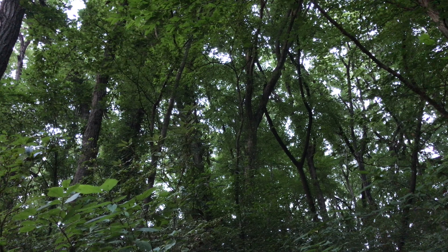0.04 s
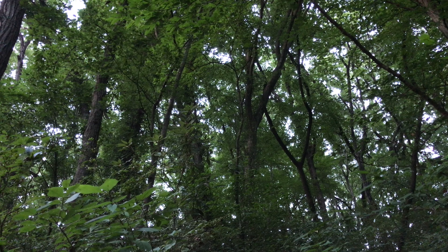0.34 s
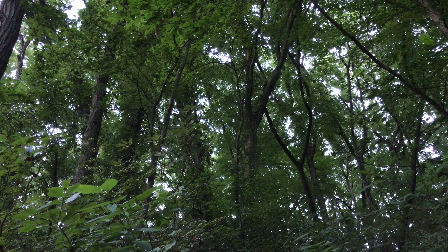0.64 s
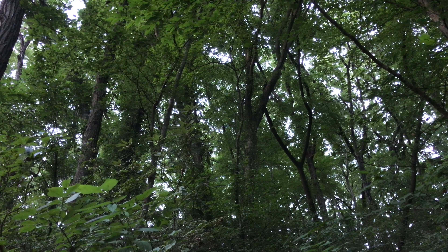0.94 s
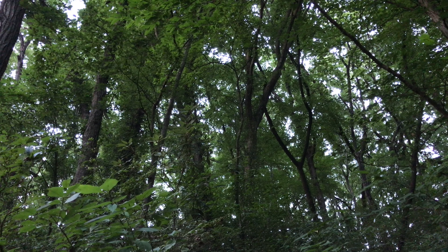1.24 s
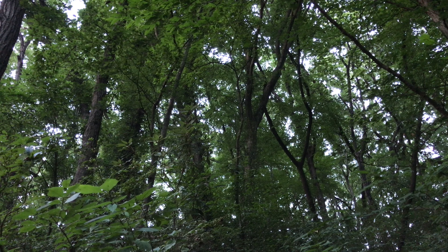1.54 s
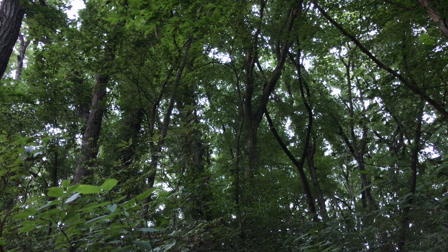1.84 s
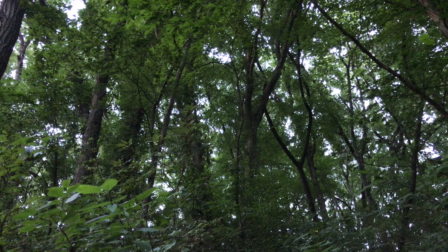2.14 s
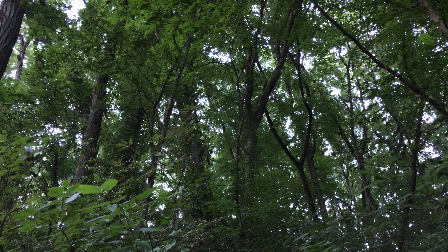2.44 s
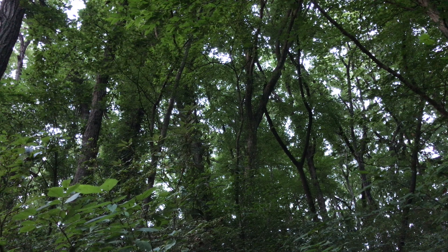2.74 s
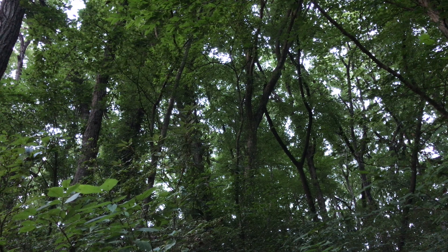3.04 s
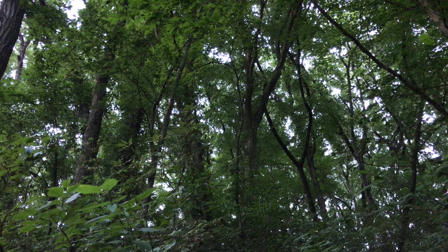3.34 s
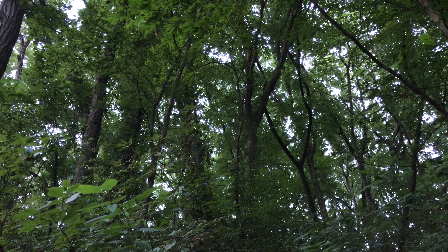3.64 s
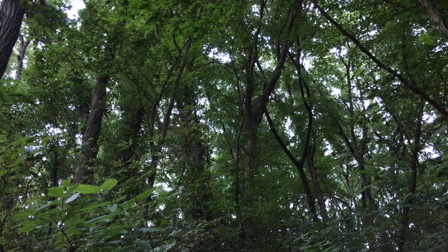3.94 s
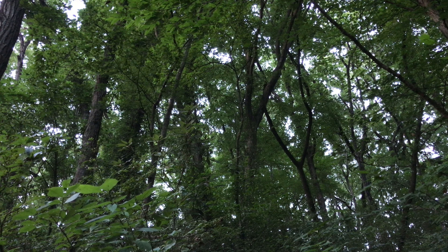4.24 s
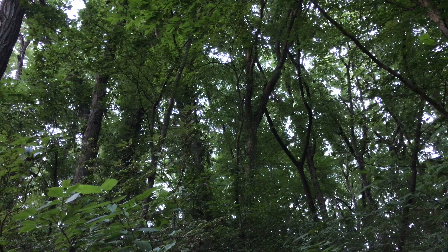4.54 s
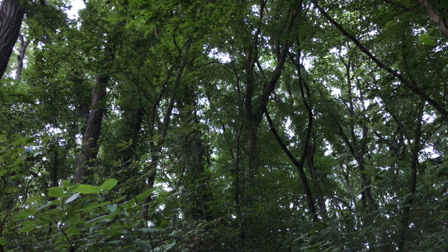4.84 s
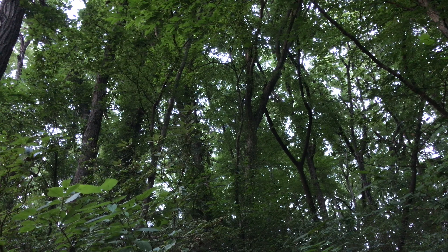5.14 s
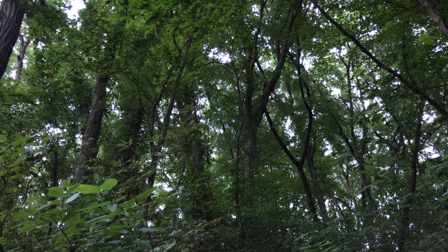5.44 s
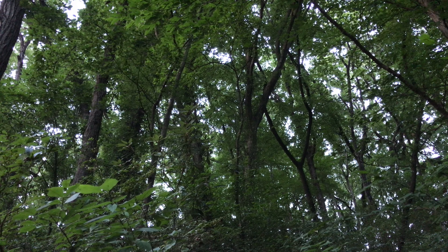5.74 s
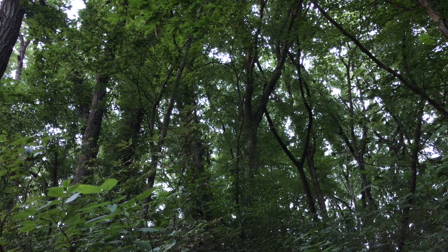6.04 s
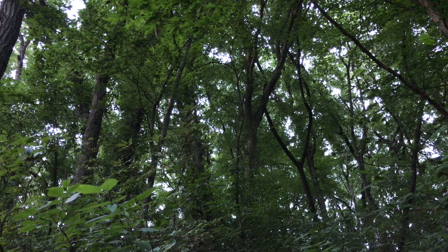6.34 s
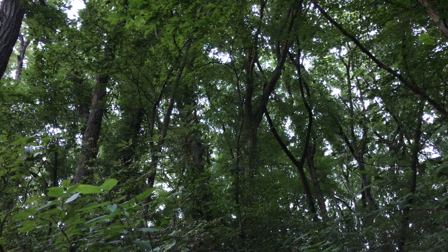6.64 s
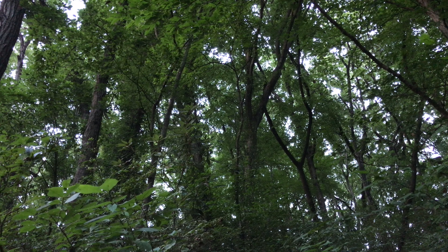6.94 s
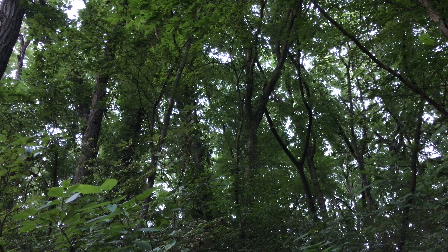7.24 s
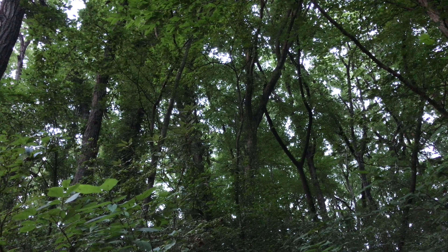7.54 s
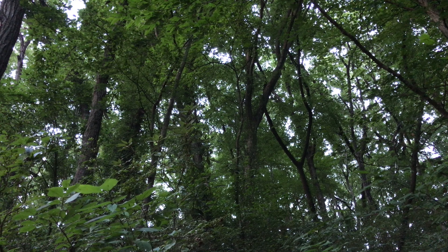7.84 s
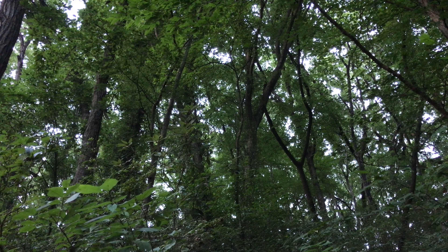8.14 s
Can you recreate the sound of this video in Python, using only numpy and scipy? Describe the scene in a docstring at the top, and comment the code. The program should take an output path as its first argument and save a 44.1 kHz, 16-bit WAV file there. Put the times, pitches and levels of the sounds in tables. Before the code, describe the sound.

Cicadas call in overlapping pulsing trills over the steady high hiss of a cicada chorus in a forest, with a low rumble underneath.

```python
"""Evening cicadas in a broadleaf wood

Pulsing trills overlap, each slowing and sinking in pitch as it runs down: a tymbal clicks and
the hollow abdomen rings on its overtones. A few calls break into harsh squawks. Behind them a
canopy full of buzzing cicadas merges into one steady high hiss. A far rumble lies underneath,
leaves stir faintly, and now and then a twig or leaf ticks."""
import sys
import numpy as np
from scipy import signal
from scipy.fft import rfft, irfft, next_fast_len
from scipy.io import wavfile
from scipy.ndimage import map_coordinates

SR = 44100
rng = np.random.default_rng(int(sys.argv[2]) if len(sys.argv) > 2 else 0)


def put_to_file(sound):
    """Save the sound as 16-bit audio at rate SR, in the file named by the first command-line argument."""
    columns = np.atleast_2d(sound).T  # one column per channel
    safe = np.clip(columns, -1, 1)
    whole_steps = np.round(safe * 32767)
    wavfile.write(sys.argv[1], SR, whole_steps.astype(np.int16))


N = 365588


def amp(db):
    """Decibels to gain."""
    return 10 ** (np.asarray(db) / 20)


def rms(x):
    """Root mean square."""
    return np.sqrt(np.mean(x ** 2) + 1e-20)


def clock():
    """Time of every sample in seconds."""
    return np.arange(N) / SR


def along(points, hz):
    """Read (Hz, value) points on a log frequency axis."""
    freqs, values = np.transpose(points)
    return np.interp(np.log(hz + 1), np.log(freqs + 1), values)


def wobble(rate):
    """A smooth random curve with `rate` knots a second."""
    knots = rng.standard_normal(int(N * rate / SR) + 4)
    coarse = np.arange(0, N, 16)
    return np.interp(np.arange(N), coarse, map_coordinates(knots, [coarse * rate / SR]))


def filtered(x, response):
    """EQ a sound with a gain given as a function of frequency."""
    size = next_fast_len(len(x) + SR // 4)
    return irfft(rfft(x, size) * response(np.fft.rfftfreq(size, 1 / SR)), size)[:len(x)]


def coloured(x, spectrum):
    """Shape a sound with (Hz, dB) points and bring it to rms 1."""
    shaped = filtered(x, lambda hz: amp(along(spectrum, hz)))
    return shaped / rms(shaped)


# The wood's reverb. Each row: frequency in Hz, seconds to die away by 60 dB.
FOREST_DECAY = [(500, 0.82), (4000, 1), (10000, 0.29)]

def forest(x, wet_db):
    """Trunks and leaves scatter part of a sound into a tail; its power stays the same."""
    hz, age, noise = signal.stft(rng.standard_normal(SR // 2), SR, nperseg=256)
    decay = amp(-60 * age / along(FOREST_DECAY, hz)[:, None])
    tail = signal.istft(noise * decay, SR, nperseg=256)[1]
    mix = x + amp(wet_db) * signal.fftconvolve(x, tail / np.linalg.norm(tail))[:N]
    return mix * rms(x) / rms(mix)


def foliage(x, treble_db):
    """A shelf above the main ring: leaves dull a voice, while a positive setting brightens it."""
    return filtered(x, lambda hz: amp(along([(4800, 0.027), (6300, treble_db)], hz)))


# The abdomen favours two groups of overtones: one an octave below the pitch, one around and above it.
# Each row: multiple of the click rate, relative level in dB.
LOWER_RING = [(6, -12.5), (7, -0.5), (8, -23.5)]
UPPER_RING = [(12, -25), (13, -4.5), (14, 2), (15, -10.5), (16, -24), (21, -5), (28, -1), (35, -17.5),
              (42, -32)]
PITCH_MULTIPLE = 14  # the overtone heard as the pitch

def tymbal(pitch, effort, jitter, lower_db, rough_db, flank_db):
    """The tymbal buckles unevenly, about 300 times a second; the abdomen rings on its overtones."""
    singing = effort > 1e-9
    click_rate = pitch / PITCH_MULTIPLE * (1 + jitter * wobble(260))
    phase = 2 * np.pi * np.cumsum(click_rate)[singing] / SR
    # a sharply tuned abdomen weakens the overtones that flank its rings
    flank = lambda k: flank_db * (k % (PITCH_MULTIPLE // 2) > 0)
    ring = lambda overtones: sum(amp(db + flank(k)) * np.sin(k * phase) for k, db in overtones)
    voice = np.zeros(N)
    voice[singing] = ring(UPPER_RING) + amp(lower_db) * ring(LOWER_RING)
    strength = amp(rough_db * np.minimum(wobble(220), 2))
    return np.sqrt(2) * effort * voice * strength / rms(strength)


WIND_UP_HZ, WIND_UP_DB = 168.7, 6  # a call starts this far below its full pitch and level

def course(start, length, wind_up_s, hz, sink_hz, db, fade_db):
    """Pitch and level of one call: it winds up quickly, then sinks and fades as the insect tires."""
    age = np.maximum(clock() - start, 0)
    slack = np.exp(-age / wind_up_s)
    spent = np.minimum(age / length, 1) ** 1.5
    waver_hz = 7 * wobble(14)  # no two syllables land on quite the same pitch
    pitch = hz - WIND_UP_HZ * slack - sink_hz * spent + waver_hz
    return pitch, db - WIND_UP_DB * slack - fade_db * spent


def syllable(start, length):
    """One squeeze of the abdomen: a rounded swell."""
    progress = np.clip((clock() - start) / length, 0, 1)
    return np.sqrt(np.abs(np.sin(np.pi * progress)))


def rhythm(start, count, first_gap, last_gap, stamina):
    """Syllable times of one call: the gaps widen, and the greater the stamina the later they do."""
    gaps = first_gap + (last_gap - first_gap) * np.linspace(0, 1, count - 1) ** stamina
    return start + np.append(0, np.cumsum(gaps))


def caller(times, hz, sink_hz, db, fade_db, syllable_s, jitter, rough_db, lower_db, flank_db,
           treble_db, wet_db, wind_up_s=0.0089):
    """A near cicada sings separate syllables, uneven in strength, along the course of its call."""
    length = times[-1] + syllable_s - times[0]
    pitch, level_db = course(times[0], length, wind_up_s, hz, sink_hz, db, fade_db)
    syllables = sum(amp(0.36 * rng.standard_normal()) * syllable(start, syllable_s) for start in times)
    voice = tymbal(pitch, amp(level_db) * syllables, jitter, lower_db, rough_db, flank_db)
    return forest(foliage(voice, treble_db), wet_db)


def near_cicadas():
    """A low, a close and a high caller finish their calls, a long one takes over, a late one follows."""
    low = rhythm(start=-.066, count=17, first_gap=.102, last_gap=.125, stamina=3.8)
    close = rhythm(start=-.046, count=4, first_gap=.124, last_gap=.133, stamina=3)
    high = rhythm(start=-.02, count=12, first_gap=.115, last_gap=.183, stamina=6.5)
    long = rhythm(start=.683, count=28, first_gap=.083, last_gap=.121, stamina=.72)
    late = rhythm(start=6.195, count=16, first_gap=.095, last_gap=.149, stamina=.52)
    return (caller(low, hz=3744, sink_hz=39.76, db=-53, fade_db=4, syllable_s=.049,
                   jitter=.003, rough_db=2.5, lower_db=-8.5, flank_db=-5, treble_db=1, wet_db=-12)
            + caller(close, hz=4232, sink_hz=32.1, db=-50.5, fade_db=-0.3, syllable_s=.068,
                     jitter=.0015, rough_db=3, lower_db=-1, flank_db=-12, treble_db=5.5, wet_db=-12)
            + caller(high, hz=4376, sink_hz=42, db=-60.5, fade_db=4.5, syllable_s=.035,
                     jitter=.0046, rough_db=3.5, lower_db=5.5, flank_db=0.5, treble_db=-12, wet_db=-5)
            + caller(long, hz=4236, sink_hz=182.9, db=-56, fade_db=11, syllable_s=.0564, wind_up_s=.11,
                     jitter=.00502, rough_db=4, lower_db=-7.5, flank_db=-1.5, treble_db=-8, wet_db=-6)
            + caller(late, hz=4374, sink_hz=128.8, db=-68, fade_db=13, syllable_s=.049,
                     jitter=.0184, rough_db=3, lower_db=2.5, flank_db=-4, treble_db=-12, wet_db=-4))


# Trills from deeper in the wood. Each row: start, length and wind-up in seconds, pitch and sink in Hz,
# level and fade in dB, jitter as a share of the click rate, lower octave in dB.
FAR_CALLS = [(0.0, 0.46, 0.0087, 4234, 26, -54.5, 4, 0.001, -15),
             (1.047, 2.45, .03, 4141, 125, -58.5, 9, 0.0066, -9),
             (1.45, 1.42, 0.0091, 4355, 19, -67, 6, 0.0022, -8.5),
             (2.597, 2.3, 0.0194, 4274, 55, -80, 9, 0.00813, 4.5),
             (4.66, 3.85, .25, 4413, 135, -65.5, 10.5, .003, -12),
             (6.105, 2.13, 0.054, 4160, 71, -69, 9.5, 0.019, -4.5),
             (7.67, 2.4, 0.021, 4237, 122, -69, 12, .008, -8)]
FIRST_RATE, LAST_RATE = 14, 8.5  # syllables a second as a trill starts and ends

def far_trill(start, length, wind_up_s, hz, sink_hz, db, fade_db, jitter, lower_db):
    """A far cicada: its syllables slow down as the call runs out, and echoes fill the gaps."""
    pitch, level_db = course(start, length, wind_up_s, hz, sink_hz, db, fade_db)
    end = start + length
    beat = np.cumsum(np.interp(clock(), [start, end], [FIRST_RATE, LAST_RATE])) / SR
    pulsing = amp(5 * np.sin(2 * np.pi * beat))
    singing = np.interp(clock(), [start - .03, start + .01, end, end + .034], [0, 1, 1, 0])
    effort = amp(level_db) * singing * pulsing / rms(pulsing)
    voice = tymbal(pitch, effort, jitter, lower_db, rough_db=5, flank_db=-7.5)
    return forest(foliage(voice, treble_db=-5), wet_db=2)


def buzzer(click_rate, scatter):
    """The click train of one buzzing cicada, uneven in timing and strength."""
    count = int(click_rate * N / SR)
    times = (np.arange(count) + scatter * rng.standard_normal(count)) / click_rate
    strengths = amp(2.5 * rng.standard_normal(count))
    clicks = np.bincount((times * SR).astype(int) % N, strengths, N)
    return clicks / rms(clicks)


# The colour of the chorus overhead. Each row: frequency in Hz, relative level in dB.
CHORUS_SPECTRUM = [(4300, -65), (5050, -24.5), (5300, -17), (5650, -12), (6000, -5.5), (6350, -2.5),
                   (7600, -1.5), (8100, 1), (8500, 0.5), (9000, -3.5), (9300, -8), (9900, -13),
                   (10450, -31), (12000, -62)]
# Whining cicadas within the hiss. Each row: pitch in Hz, level in dB.
CHORUS_WHINES = [(6790, -59.5), (7150, -57), (7490, -70), (7860, -55), (8050, -70), (8420, -55.5)]

def canopy():
    """Countless buzzers blur into a hiss; the nearest adds grain and a few hold a thin whine."""
    crowd = rng.standard_normal(N) + amp(-10.5) * buzzer(click_rate=360, scatter=.25)
    hiss = amp(-44.5 + 0.16 * wobble(12)) * coloured(crowd, CHORUS_SPECTRUM)
    whines = np.zeros(N)
    for hz, db in CHORUS_WHINES:
        level = amp(db + 2 * wobble(3))
        pitch = hz * (1 + .00374 * wobble(300) + .002 * wobble(2))  # fast flutter, slow drift
        whines += level * np.sin(2 * np.pi * np.cumsum(pitch) / SR)
    return hiss + forest(whines, wet_db=14.5)


# The low bed under the wood. Each row: frequency in Hz, relative level in dB.
RUMBLE_SPECTRUM = [(15, -60), (25, -36), (31, -20), (38, -4), (50, -1), (63, 1), (80, -5.5), (105, -9.5),
                   (160, -21.5), (200, -21.5), (300, -27), (450, -36), (900, -62)]

def far_rumble():
    """Deep, distant noise at an almost even level."""
    return amp(-49.5 - 0.1 * wobble(7)) * coloured(rng.standard_normal(N), RUMBLE_SPECTRUM)


# A soft, broad rustle. Each row: frequency in Hz, relative level in dB.
RUSTLE_SPECTRUM = [(250, -4.5), (450, 0), (1050, -0.5), (1600, -4), (2600, -6.5), (3300, -10), (4700, -5.5),
                   (8000, 0), (11500, -1.5), (13000, -4), (15000, -10.5)]

def leaves():
    """Stirring leaves make a faint noise whose level flickers."""
    return amp(-61 + 1.1 * wobble(6.3)) * coloured(rng.standard_normal(N), RUSTLE_SPECTRUM)


# The colour of the top hiss. Each row: frequency in Hz, relative level in dB.
HISS_SPECTRUM = [(2000, -11), (4500, -6.5), (10000, -4.5), (13000, -7), (15000, -7), (17200, -7)]
# Its fader moves. Each row: time in seconds, level in dB.
HISS_FADER = [(0, -61.5), (2.6, -62.8), (2.85, -71), (8.29, -65)]

def top_hiss():
    """A thin, airy hiss that drops away a third of the way in and creeps partly back."""
    times, levels_db = np.transpose(HISS_FADER)
    level = amp(np.interp(clock(), times, levels_db))
    return level * coloured(rng.standard_normal(N), HISS_SPECTRUM)


# Small hits on twigs and leaves. Each row: start in seconds, level in dB, ring in Hz.
TWIG_HITS = [(0.21, -55, 1060), (0.49, -53, 1000), (0.838, -49, 1320), (1.05, -51, 1060), (1.075, -53, 990),
             (1.57, -54, 1130), (2.67, -56, 1800), (3.16, -56, 1040), (5.157, -48, 600), (5.274, -51, 880),
             (5.797, -50, 1500), (6.862, -52, 1500), (7.772, -53, 1030), (8.066, -48, 895),
             (8.099, -54, 1080)]

def twig_ticks():
    """Something small drops on a leaf or twig: a brief crack and a woody ring."""
    age = np.arange(SR // 6) / SR
    envelope = amp(-60 * age / .075) * (1 - np.exp(-age / .0015))
    ticks = np.zeros(N)
    for start, db, hz in TWIG_HITS:
        spectrum = [(hz / 4, -12), (hz, 0), (2 * hz, -4), (6 * hz, -22)]
        crack = coloured(rng.standard_normal(len(age)), spectrum)
        ring = np.sin(2 * np.pi * hz * age)
        knock = (amp(-4) * crack + amp(-10) * ring) * envelope
        at = round(start * SR)
        ticks[at:at + len(age)] += amp(db) * knock[:N - at]
    return forest(ticks, wet_db=-8)


# Harsh squawks as a call breaks off or starts up.
# Each row: start and length in seconds, pitch in Hz, level in dB, lower octave in dB.
SQUAWK_CUES = [(3.676, 0.073, 3820, -60, 1), (4.19, .13, 4720, -74, -20), (4.42, 0.16, 4780, -70, -24),
               (4.563, 0.15, 3900, -65, -25), (4.82, 0.15, 3930, -70, -6)]

def squawks():
    """A tymbal that buckles very unevenly rasps instead of ringing."""
    rasps = np.zeros(N)
    for start, length, hz, db, lower_db in SQUAWK_CUES:
        effort = amp(db) * syllable(start, length)
        rasps += tymbal(hz, effort, jitter=.05, lower_db=lower_db, rough_db=4, flank_db=0)
    return forest(foliage(rasps, treble_db=-5), wet_db=-2)


def scene():
    """The wood from one spot, in mono: overlapping calls in front, chorus and quiet beds behind."""
    calls = near_cicadas() + sum(far_trill(*row) for row in FAR_CALLS) + squawks()
    return (calls + canopy() + twig_ticks() + far_rumble() + leaves() + top_hiss())[None]


def record(dry):
    """A brick-wall low-pass takes off everything above 17250 Hz."""
    return np.array([filtered(channel, lambda hz: hz < 17250) for channel in dry])


dry = scene()
out = record(dry)
put_to_file(out)
```